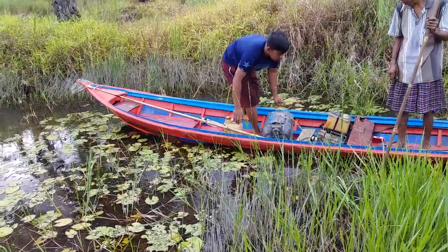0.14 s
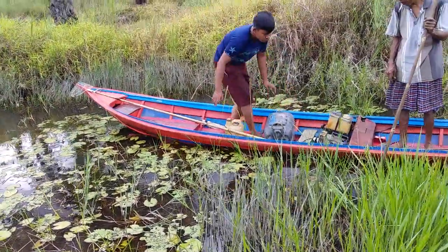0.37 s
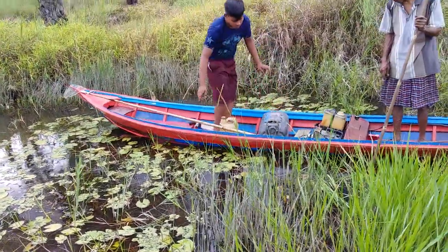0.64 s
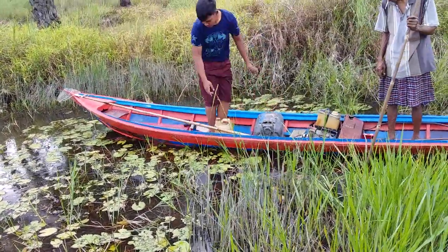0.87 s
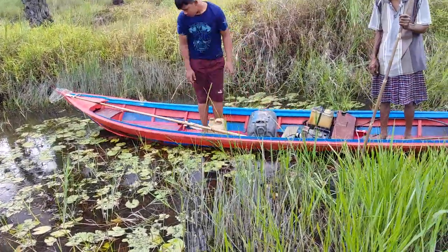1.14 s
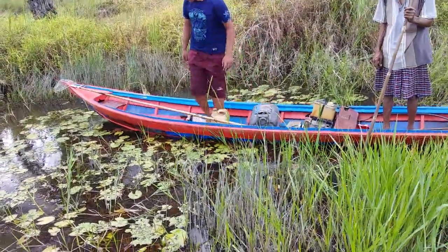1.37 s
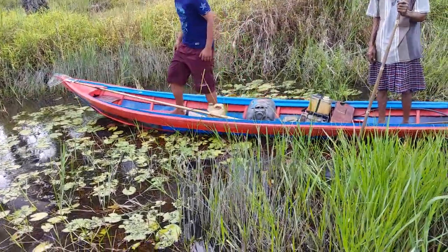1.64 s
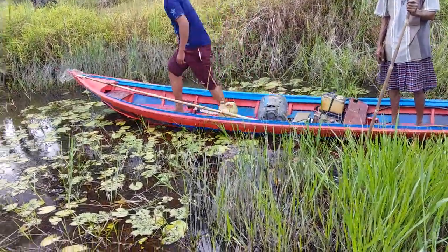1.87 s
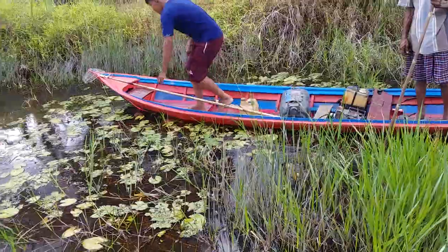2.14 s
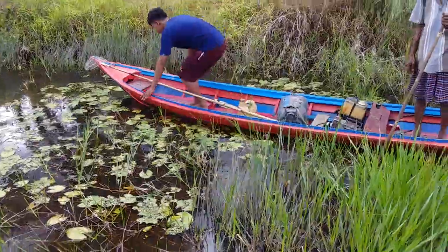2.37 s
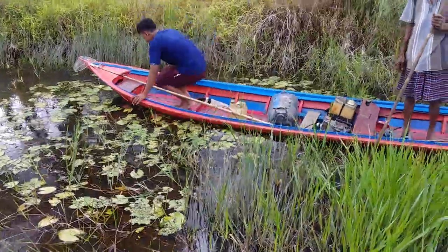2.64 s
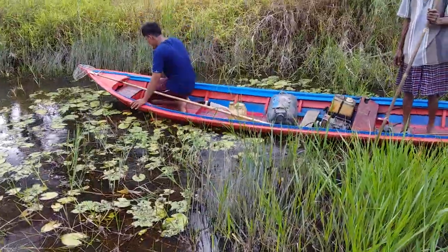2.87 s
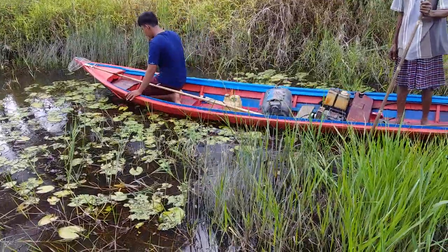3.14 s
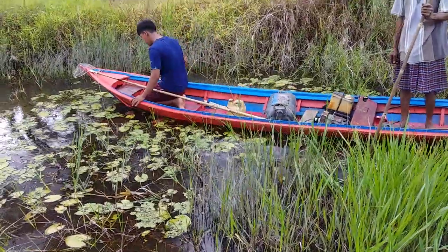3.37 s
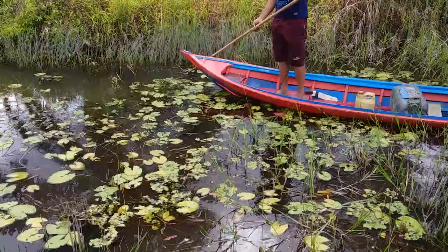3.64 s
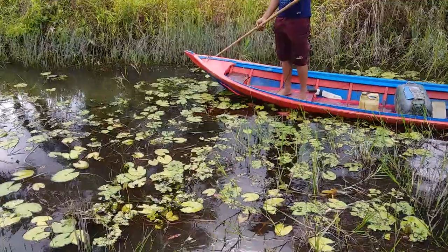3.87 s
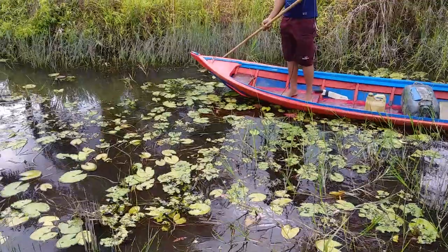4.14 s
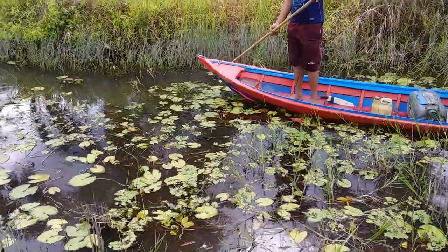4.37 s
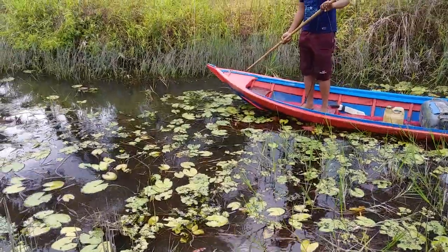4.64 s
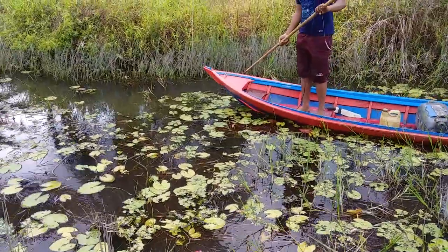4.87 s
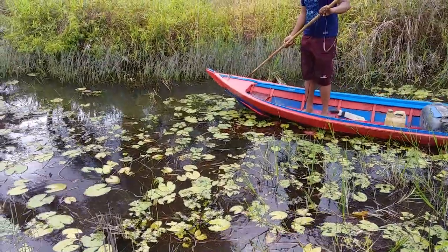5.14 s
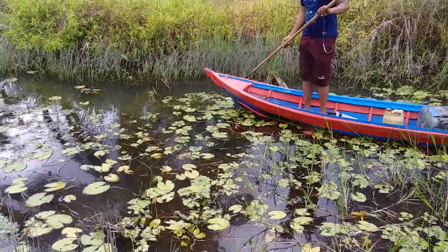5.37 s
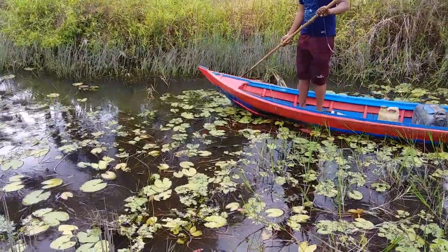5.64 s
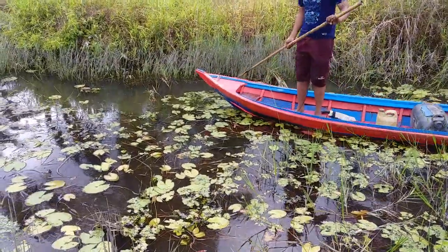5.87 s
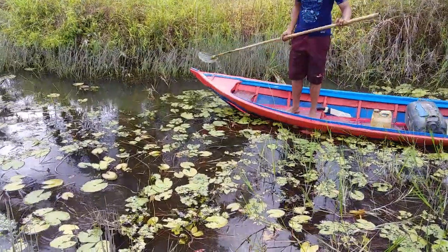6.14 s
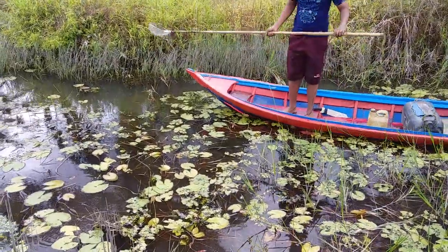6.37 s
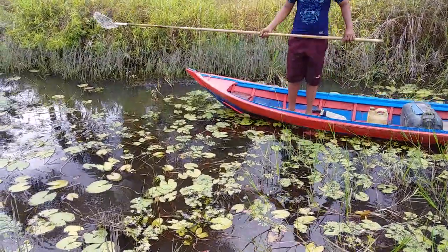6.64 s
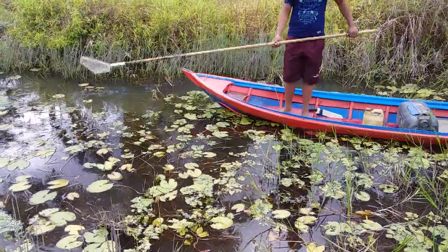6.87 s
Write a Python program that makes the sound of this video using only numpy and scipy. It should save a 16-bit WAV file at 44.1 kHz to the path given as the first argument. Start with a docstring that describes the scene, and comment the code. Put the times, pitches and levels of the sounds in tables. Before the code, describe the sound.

Outdoors on a quiet pond, a small single-cylinder boat engine idles unevenly, soft thumps mixed with louder cracks and metallic rattle. Knocks land on the wooden hull. The strokes spread out and the engine dies, leaving faint still air and a few weak knocks. An abrupt cut brings the engine back much louder, beating rapidly and steadily, then revving up. Heard from the bank, duller in the first half.

```python
"""On the bank of a pond, a small one-cylinder boat engine idles with misfires, slows and dies.
Knocks on the wooden hull sound now and then as it idles and dies, and a few more after it stops;
then the sound cuts abruptly to the engine running and opening up. Each exhaust stroke is a short crack
of filtered noise and a low swing of pipe pressure. Resonated noise makes the casing rattle and the
planks hum; decaying modes make the knocks; still air is shaped noise."""
import sys
import numpy as np
from scipy import signal
from scipy.fft import rfft, irfft
from scipy.io import wavfile
from scipy.ndimage import uniform_filter1d

SR = 44100
rng = np.random.default_rng(int(sys.argv[2]) if len(sys.argv) > 2 else 0)


def put_to_file(sound):
    """Save the sound as 16-bit audio at rate SR, in the file named by the first command-line argument."""
    columns = np.atleast_2d(sound).T  # one column per channel
    safe = np.clip(columns, -1, 1)
    whole_steps = np.round(safe * 32767)
    wavfile.write(sys.argv[1], SR, whole_steps.astype(np.int16))


def voltage_ratio(level):
    """Linear amplitude factor for a level in decibels (scalar or array-like)."""
    return 10 ** (np.asarray(level, float) / 20)


N = 309141
T = np.arange(N) / SR  # s
CUT_S = 3.482  # from the dead engine to the running one
BEFORE_CUT = T < CUT_S


def evened(x):
    """Power normalisation: scales to rms 1."""
    return x / np.sqrt(np.mean(x ** 2) + 1e-20)


def add(mix, s, sound):
    """Superposition: mixes a sound in at time s."""
    at = round(s * SR)
    sound = sound[max(-at, 0):]
    part = mix[max(at, 0):][:len(sound)]
    part += sound[:len(part)]


def coloured(x, points):
    """Spectral shaping: weights the spectrum by (Hz, dB) points joined over log frequency."""
    f, db = np.transpose(points)
    hz = np.fft.rfftfreq(len(x), 1 / SR)
    gain_db = np.interp(np.log(hz + 1), np.log(f + 1), db)
    return irfft(rfft(x) * voltage_ratio(gain_db), len(x))


def resonate(x, hz, width):
    """Heterodyne resonance: shifts the curve hz to zero, smooths, and shifts back, with gain 1."""
    turn = np.exp(2j * np.pi * np.cumsum(hz * np.ones(len(x))) / SR)
    r = np.exp(-np.pi * width / SR)
    smooth = signal.lfilter([1 - r], [1, -r], x / turn)
    return 2 * (turn * smooth).real


def lumpy(lump_db, size):
    """Amplitude modulation: noise whose level wanders in lumps of the given number of samples."""
    noise, slow = rng.standard_normal((2, N))
    wander = evened(uniform_filter1d(uniform_filter1d(slow, size), size))
    return noise * voltage_ratio(lump_db * wander)


# Uneven strokes while idling and dying, fired ones loud.
# Each row: time in seconds, thump level in dB, crack level in dB.
IDLE_STROKES = [(0.0032, -25, -32), (0.106, -23.5, -54), (0.223, -27, -51), (0.3368, -13, -20),
                (0.446, -22, -45), (0.5555, -12.5, -17.5), (0.6607, -13, -23.5), (0.7628, -18.5, -33.5),
                (0.8643, -18.5, -50), (0.9737, -23.5, -61), (1.0937, -19.5, -36), (1.2146, -14, -20),
                (1.3353, -21.5, -37), (1.4665, -22, -41), (1.6156, -16.5, -29), (1.778, -19.5, -42),
                (1.9526, -15.5, -23.5), (2.1149, -21, -33), (2.29, -16.5, -23), (2.4568, -23, -36.5)]
# Running, then the throttle opens. Each row: time in seconds, firing rate in strokes per second.
SPEED = [(3.5, 15.041), (3.814, 14.565), (5.861, 14.529), (6.051, 16.112), (6.268, 17.441), (7.01, 19.018)]
# Load while running. Each row: time in seconds, mean thump level in dB, mean crack level in dB,
# typical brightest part of the crack in Hz.
LOAD = [(3.5, -6.5, -21.5, 5800), (4, -5.5, -21, 5840), (4.6, -6.5, -19, 5600), (5.3, -6, -18, 6370),
        (5.85, -6, -19.5, 7270), (6.1, -5.5, -21, 5600), (6.5, -4, -17, 5900), (7, -4.5, -20.5, 5140)]
# Strokes that crack harder than their neighbours.
# Each row: time in seconds, crack level in dB, brightest part of the crack in Hz.
BANGS = [(4.067, -18.5, 7100), (4.548, -17.5, 5630), (5.647, -15.5, 6540), (6.401, -14.5, 3180),
         (6.514, -14, 5700), (6.733, -17.5, 5900), (6.841, -17, 5550)]


def strokes():
    """Phase accumulation: running strokes fall where the integrated firing rate passes whole numbers.
    Gives rows of (s, thump dB, crack dB, brightest Hz), idle strokes first."""
    t = np.arange(3.5217, N / SR, 1 / SR)  # from the first running stroke
    turns = np.cumsum(np.interp(t, *np.transpose(SPEED))) / SR
    run_s = np.interp(np.arange(int(turns[-1]) + 1), turns, t)
    load_s, *load = np.transpose(LOAD)
    running = np.array([run_s] + [np.interp(run_s, load_s, column) for column in load]).T
    running[:, 1:3] += rng.standard_normal((len(running), 2)) * [0.55, 1.5]  # dB of thump, crack
    # weaker idle cracks are duller: 70 Hz lower per dB
    idle = np.array([(*row, 5800 + 70 * (row[2] + 20)) for row in IDLE_STROKES])
    rows = np.concatenate([idle, running])
    rows[:, 3] *= np.exp(0.11 * rng.standard_normal(len(rows)))
    for s, crack_db, crack_hz in BANGS:
        nearest = abs(rows[:, 0] - s).argmin()
        rows[nearest, 2:] = crack_db, crack_hz
    return rows


# Spectrum of an air jet. Each row: frequency in Hz, relative level per Hz in dB.
CRACK = [(530, -12), (900, -0.5), (1000, -23), (1230, 4.5), (1440, -4), (2250, -2), (3230, -0.5), (4920, 1),
         (5410, -1), (7310, -0.5), (9200, -13), (12600, -20), (16000, -14)]
# Rings of the muffler shell. Each row: frequency in Hz, width in Hz.
MUFFLER = [(1245, 64), (3200, 120), (4500, 130), (5600, 460), (6600, 59), (7400, 1100), (12500, 1760)]


def strokes_per_s(rows):
    """Reciprocal of the period: from stroke spacing before the cut, from the speed curve after it."""
    s = rows[:, 0]
    period = np.where(s < CUT_S, np.gradient(s), 1 / np.interp(s, *np.transpose(SPEED)))
    return 1 / np.clip(period, .05, .17)


def pipe_thump(t, speed, pipe_hz):
    """Pipe oscillation: the slug of gas swings the pipe about one and a half times."""
    swing = t * pipe_hz
    late = swing - (.35 - 0.025 * speed)  # slow strokes build up later
    rise = np.exp(-(late / 0.72) ** 2)
    fall = np.exp(-(abs(late) / 0.71) ** 3)
    return -np.where(late < 0, rise, fall) * np.cos(2 * np.pi * swing)


def valve_crack(after, crack_hz):
    """Turbulent jet: the opening valve releases hiss that rings the muffler shell."""
    jet = np.exp(-((after - .0024) / 0.0019) ** 4) + voltage_ratio(-6) * np.exp(-after / 0.017)
    air = evened(coloured(rng.standard_normal(len(after)), CRACK)) * jet * (after > 0)
    ring_db = rng.uniform(-21.5, 4.6, len(MUFFLER)) + 10.5  # no two strokes ring alike
    rings = sum(voltage_ratio(db) * resonate(air, hz, w) for (hz, w), db in zip(MUFFLER, ring_db))
    crack = air + rings + voltage_ratio(10) * resonate(air, crack_hz, 270)
    return crack * np.linalg.norm(air) / np.linalg.norm(crack)


def exhaust(rows):
    """Pulsed gas discharge: each stroke cracks, pops and thumps, and the bottom boards resonate."""
    out, t = np.zeros(N), np.arange(-1024, 3072) / SR
    for (s, thump_db, crack_db, crack_hz), speed in zip(rows, strokes_per_s(rows)):
        pipe_hz = 150 + 2.38 * speed  # hotter gas, higher pipe note
        after = np.maximum(t + 1.3 / pipe_hz, 0)  # time since the valve opened
        thump = voltage_ratio(thump_db) * pipe_thump(t, speed, pipe_hz)
        pop = voltage_ratio(thump_db - 9.5) * np.sin(2 * np.pi * 720 * after) * np.exp(-after / 0.0017)
        crack = voltage_ratio(crack_db) * valve_crack(after, crack_hz)
        add(out, s + t[0], thump + pop + crack)
    return out + voltage_ratio(-8) * resonate(out, 146.0, 25.7)


# How hard the engine shakes between strokes: one list before the cut, one after.
# Each row: time in seconds, shaking level in dB.
SHAKE = [
    [(0, -41), (.63, -39), (1.18, -40), (1.53, -43.5), (2.3, -44), (2.38, -42), (2.5, -47), (2.6, -49.5),
     (2.7, -65), (3.4, -70)],
    [(3.5, -33), (4.95, -29.5), (5.6, -31.5), (6.5, -28.5), (7, -28)],
]


def shaking():
    """Forced vibration: the shaking level in dB that drives hum, rattle and rush."""
    before, after = (np.interp(T, *np.transpose(part)) for part in SHAKE)
    return np.where(BEFORE_CUT, before, after)


def gear_clumps(rows):
    """Periodic modulation: valve gear and piston clatter hardest just ahead of each stroke."""
    times = sorted([*rows[:, 0], 2.68])  # the crank coasts through one last silent stroke
    turn = np.interp(T, times, np.arange(len(times)))  # one count per stroke, two turns of the crank
    clumps_db = 1.6 * np.cos(2 * np.pi * (turn + 0.11)) + 2.4 * np.cos(4 * np.pi * (turn + 0.075))
    return voltage_ratio(clumps_db * np.where(BEFORE_CUT, 1.2, .5))  # clearer at low speed


# Spectrum of the plank hum. Each row: frequency in Hz, relative level per Hz in dB.
PLANKS = [(40, -17), (80, -0.5), (150, 1), (230, 2.5), (330, -6.5), (500, -48)]


def plank_hum(shake_db):
    """Structure-borne sound: shaking makes the planks hum; at speed they boom on one note."""
    planks = evened(coloured(lumpy(1.5, size=500), PLANKS))
    boom = voltage_ratio(np.where(BEFORE_CUT, -6, 9)) * resonate(planks, 140.7, 19)
    return voltage_ratio(-41 + 1.11 * (shake_db + 40)) * (planks + boom)


# Modes of the engine casing. Each row: frequency in Hz, width in Hz, relative level in dB.
CASING = [(335.6, 28, -4.5), (440.2, 49.4, 2), (619, 104, -1), (714.4, 53, 0.5), (1165, 77, -10),
          (1920, 70, -13)]


def casing_ring():
    """Modal resonance: a stream of uneven noise rings the casing."""
    ticks = lumpy(0.41, size=200)
    modes = [voltage_ratio(db) * resonate(ticks, hz, w) * np.sqrt(100 / w) for hz, w, db in CASING]
    return evened(sum((-1) ** k * mode for k, mode in enumerate(modes)))  # alternating sign


# Loose parts. Each row: frequency in Hz, width in Hz, relative level in dB.
LOOSE = [(624, 170, 1.5), (868, 150, -4.5), (1230, 220, -1), (1618, 190, -4.5), (2025, 330, -3),
         (2590, 200, -9.5), (3275, 110, -9), (4040, 180, -8), (7970, 340, -8.5)]


def loose_clatter(gear):
    """Random impact excitation: hits, denser in the clumps, ring each loose part."""
    # every part starts at its own moments
    hits = (rng.random((len(LOOSE), N)) < 60 * gear ** 2 / SR) * rng.random((len(LOOSE), N))
    # before the cut, now and then a jolt shakes them all
    hits += .6 * BEFORE_CUT * (rng.random(N) < 30 * gear ** 2 / SR) * rng.random(N)
    chatter = signal.lfilter([1], [1, -np.exp(-1 / (0.009 * SR))], hits)  # decay constant 9 ms
    chatter = chatter * rng.standard_normal(hits.shape)
    clatter = np.zeros(N)
    for hit, (hz, w, db) in zip(chatter, LOOSE):
        clatter += voltage_ratio(db) * evened(resonate(resonate(hit, hz, w), hz, 3 * w))
    return evened(clatter)


def rattle(shake_db, gear):
    """Impact noise: casing and loose parts tick in the clumps of the gear."""
    metal = gear ** 1.39 * casing_ring() + voltage_ratio(np.where(BEFORE_CUT, 1, -8)) * loose_clatter(gear)
    return voltage_ratio(shake_db) * metal


# Spectrum of the air in the fins. Each row: frequency in Hz, relative level per Hz in dB.
HISS = [(530, -29), (900, -4), (1230, -7), (1440, -4.5), (2220, -5), (3260, -4.5), (4860, -6), (5410, -9.5),
        (7140, -6.5), (9200, -22), (16000, -33)]


def air_rush(shake_db, gear):
    """Flow noise: air rushes through the fins, growing more slowly than the shaking."""
    air = evened(coloured(lumpy(1.9, size=100), HISS))
    return voltage_ratio(-42 + 0.64 * (shake_db + 40)) * gear ** 0.34 * air


# Spectrum of the still air. Each row: frequency in Hz, relative level per Hz in dB.
POND = [(24, -40), (40, 15), (75, 16.5), (320, 1.5), (965, -34), (7170, 2), (11000, -23.5), (14800, -12),
        (16000, -28.5)]


def pond():
    """Stationary noise: still air over the water, with a thin high tone of narrowband noise."""
    tone = voltage_ratio(-72) * evened(resonate(rng.standard_normal(N), 15646, 12))
    return voltage_ratio(-57) * evened(coloured(lumpy(0.92, size=2000), POND)) + tone


# Each row: time in seconds, level in dB before a common lift, treble share in dB per octave,
# scuff decay time in seconds.
KNOCKS = [(0.71, -26.5, -5, .015), (0.764, -20.5, -2.5, 0.0065), (0.776, -19.5, -5.5, 0.0086),
          (1.737, -29, -1, 0.009), (2.379, -25, 0.5, 0.0088), (2.386, -33, 6, 0.0066),
          (2.43, -34, 2, 0.0055), (2.531, -34, 4, 0.014), (2.565, -36.5, 3, .014), (2.648, -45, -6, 0.012),
          (2.674, -47, 1, 0.012), (3.177, -41, -5, 0.03), (3.246, -44.5, -1.5, 0.012),
          (3.285, -46.5, 2, 0.013)]
# Modes of the hull. Each row: frequency in Hz, relative level in dB, time to fall 60 dB in seconds.
HULL = [(185, -11, 0.23), (250, -3.5, 0.06), (308, 0.5, 0.076), (504, 2, 0.033), (720, -3, 0.023),
        (990, -9, 0.019), (1313, 0.5, 0.045), (1624, -7, 0.086), (1870, -1, .03), (3300, 5.5, 0.0064)]


def knocks():
    """Modal superposition: a scuffing blow rings the planks, each spot weighting the modes its own way."""
    out, t = np.zeros(N), np.arange(6000) / SR
    for s, db, treble_db, scuff in KNOCKS:
        blow = rng.standard_normal(len(t)) * np.exp(-t / scuff)
        ring = np.zeros(len(t))
        for hz, mode_db, t60 in HULL:
            level_db = mode_db + treble_db * np.log2(hz / 250) - 60 * t / t60
            ring += voltage_ratio(level_db) * np.sin(2 * np.pi * hz * t)
        sound = signal.fftconvolve(blow, ring)
        add(out, s, voltage_ratio(db + 3.5) * sound / abs(sound).max())
    return out


def puffs():
    """Transient jet noise: soft short jets ahead of the strokes once the engine labours."""
    out, t = np.zeros(N), np.arange(2048) / SR
    rows = [(2.384, -25.5)]  # (s, dB): one stray puff as the crank rocks near the stop
    for (s, _, crack_db), (next_s, *_) in zip(IDLE_STROKES, IDLE_STROKES[1:]):
        if s > .9:  # labours from here
            lead_s = .0105 + .18 * (next_s - s)
            rows.append((s - lead_s, -23.5 + 0.4 * (crack_db + 23.5)))
    for s, db in rows:
        air = evened(coloured(rng.standard_normal(len(t)), CRACK))
        add(out, s, voltage_ratio(db) * air * (1 - np.exp(-t / 0.0012)) * np.exp(-t / 0.0068))
    return out


# A treble dip that glides as the boat drifts, likely the bounce off the water.
# Each row: time in seconds, frequency in Hz, depth from 0 to 1.
DIP = [(0, 4720, 0.45), (3.4, 4670, 0.02), (4.2, 3800, 0.28), (4.9, 4430, 0.7), (5.7, 4980, 0.98),
       (6.2, 4710, 0.53), (7, 4370, 0.86)]


def gliding_dips(boat):
    """Interference: subtracting a resonance carves the gliding dip and a shallower one an octave below."""
    s, hz, depth = np.transpose(DIP)
    hz, depth = np.interp(T, s, hz), np.interp(T, s, depth)
    boat = boat - depth * resonate(boat, hz, 1210)
    return boat - 0.53 * depth * resonate(boat, hz / 2, 250)


# Before the cut the boat is heard from another spot, and sounds duller.
# Each row: frequency in Hz, gain in dB.
FIRST_SPOT = [(60, 3), (250, 2.5), (450, -4.5), (800, -2), (2000, -1), (4000, -2), (7000, -4), (11000, -8)]


def duller_before_cut(boat):
    """Linear filtering: the spectrum of the other listening spot, up to the cut."""
    return np.where(BEFORE_CUT, coloured(boat * BEFORE_CUT, FIRST_SPOT), boat)


def scene():
    """Superposition: engine and hull pass the gliding dips; the pond lies under all."""
    rows = strokes()
    shake_db, gear = shaking(), gear_clumps(rows)
    boat = exhaust(rows)
    boat += plank_hum(shake_db) + rattle(shake_db, gear) + air_rush(shake_db, gear)
    boat += knocks() + puffs()
    return (duller_before_cut(gliding_dips(boat)) + pond())[None]


def band_limit(x):
    """A steep low-pass at the top of the band."""
    return signal.sosfilt(signal.butter(12, 16820, fs=SR, output="sos"), x)


def record(dry):
    """Band limiting: the microphone drops the deepest bass and the top edge."""
    response = [(20, -31), (40, -27), (60, -1.5), (80, -1), (15800, -2.0), (16100, -28)]  # (Hz, dB)
    mix = coloured(dry[0], response)[None]
    return band_limit(mix)


dry = scene()
out = record(dry)
put_to_file(out)
```